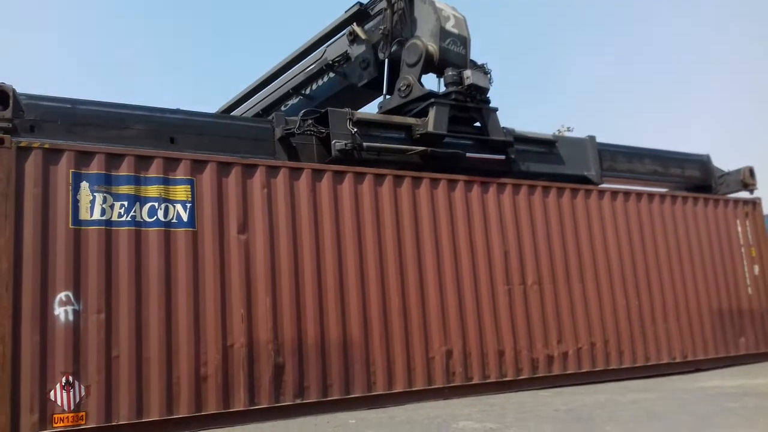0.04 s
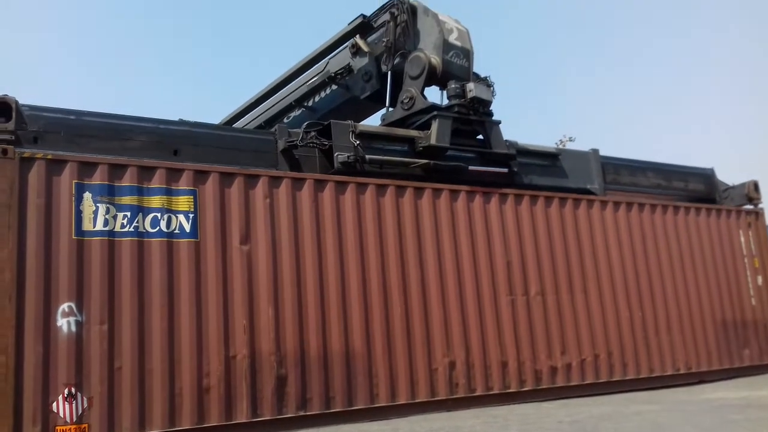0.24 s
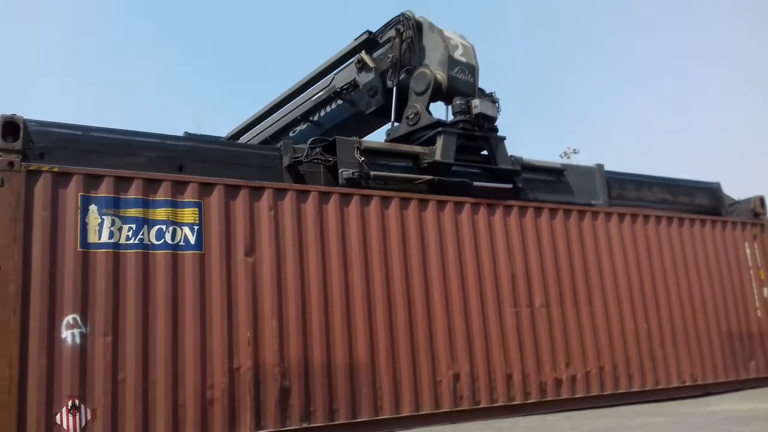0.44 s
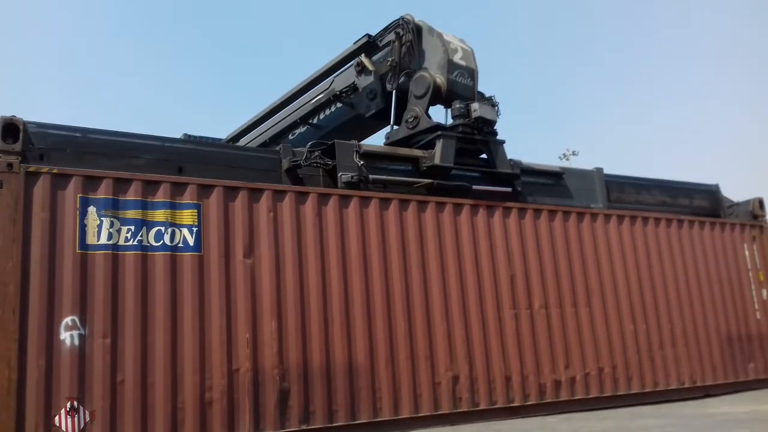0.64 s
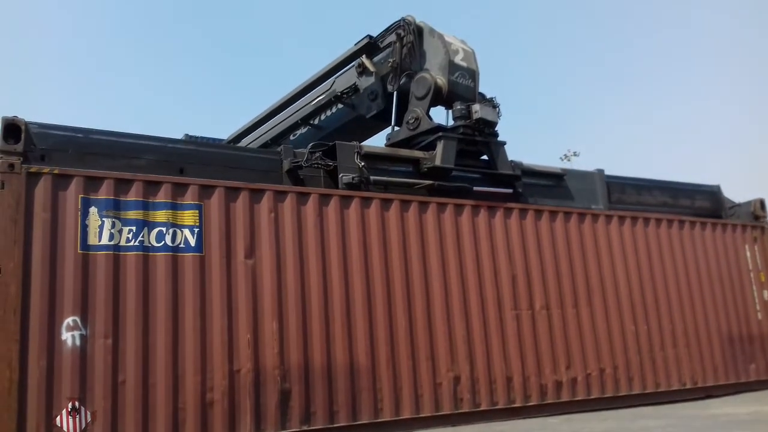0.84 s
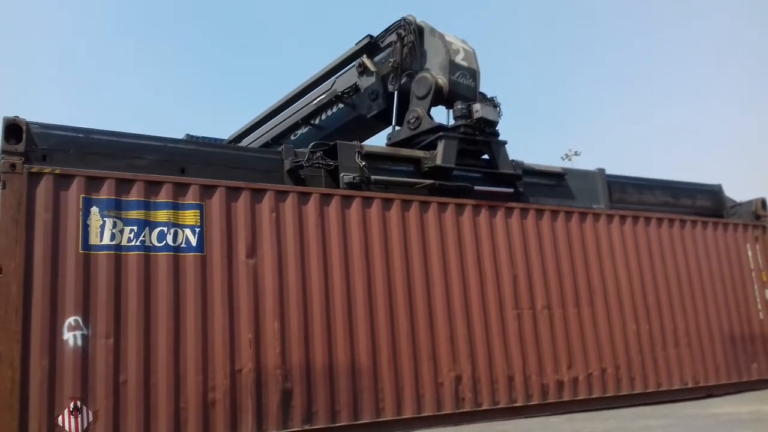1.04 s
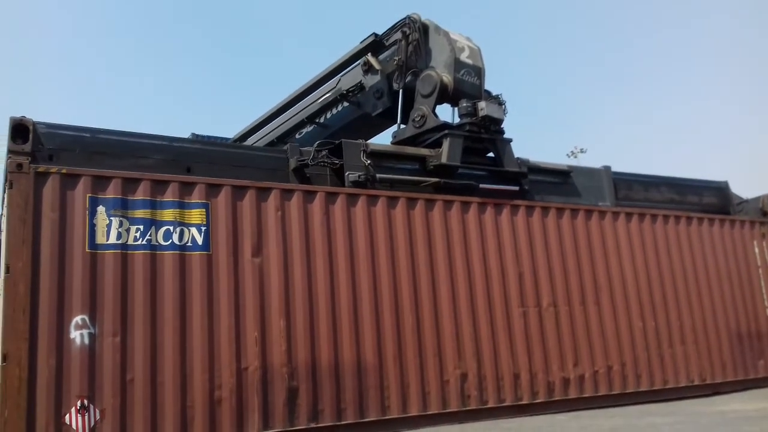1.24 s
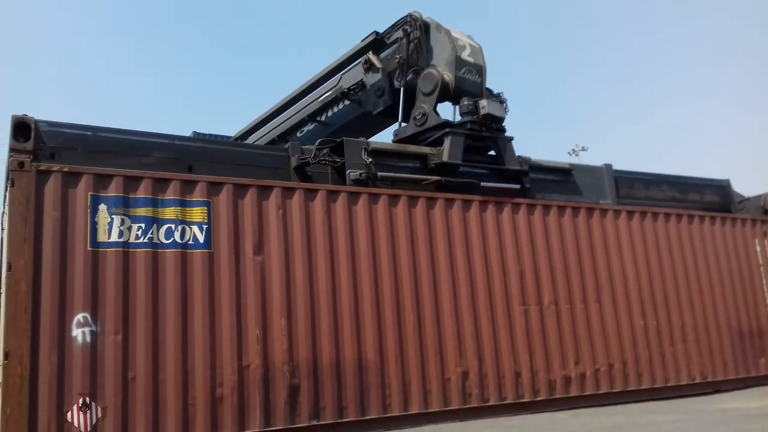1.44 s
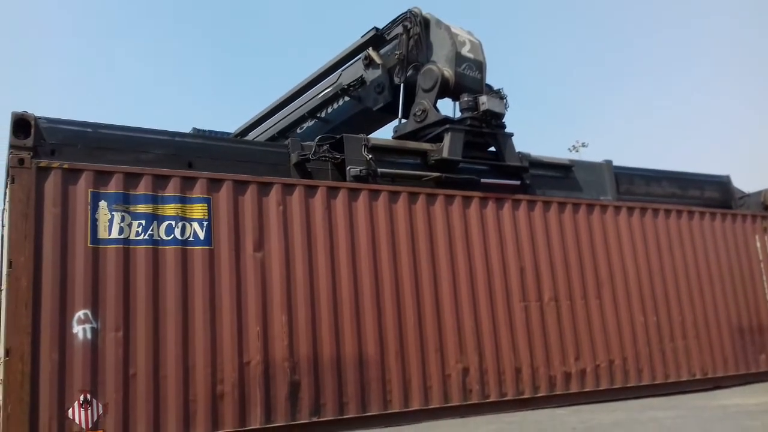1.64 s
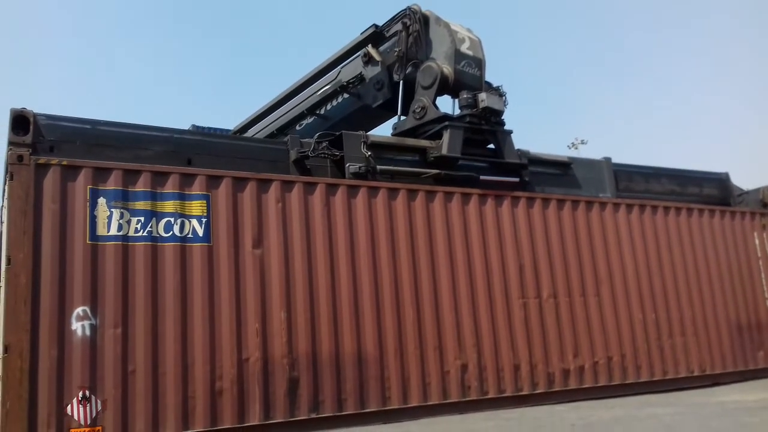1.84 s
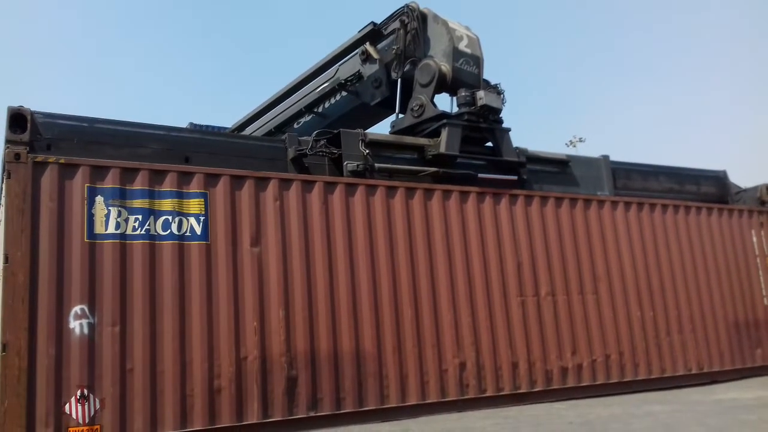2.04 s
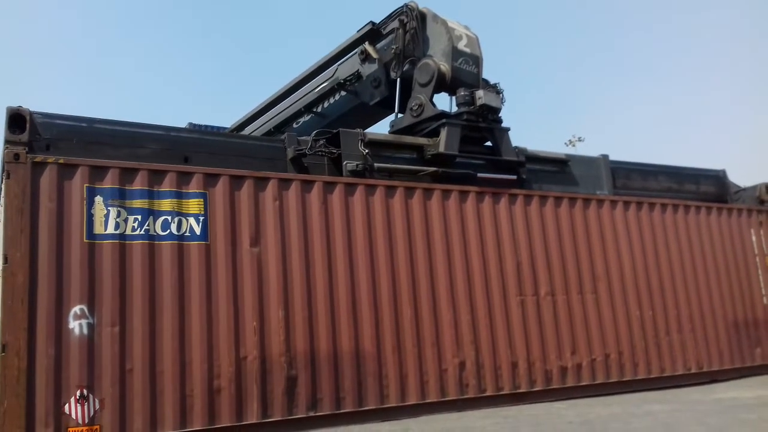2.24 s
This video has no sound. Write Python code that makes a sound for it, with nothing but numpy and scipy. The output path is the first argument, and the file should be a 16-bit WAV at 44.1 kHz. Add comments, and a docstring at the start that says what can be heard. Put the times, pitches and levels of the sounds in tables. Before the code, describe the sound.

Rattling metal blows build to a hollow, ringing crash as a lifting frame knocks an empty shipping container in an outdoor yard. After a short lull the fittings clank and squeak again, over a steady low diesel rumble.

```python
"""In a container yard, a lifting spreader (the crane's gripping frame) jolts against an empty steel
shipping container. A run of blows swells into a booming crash, then the fittings clank a few more times.
Each blow chatters and rings the walls, the frame and the locks. Loose parts click, square hits crack
and slipping steel squeaks. A diesel engine rumbles underneath, and a faint short groan comes at the end."""
import sys
import numpy as np
from scipy import signal
from scipy.fft import irfft
from scipy.io import wavfile
from scipy.ndimage import uniform_filter1d

SR = 44100
rng = np.random.default_rng(int(sys.argv[2]) if len(sys.argv) > 2 else 0)


def master(y):
    """Save y as 16-bit WAV."""
    cut = np.clip(np.atleast_2d(y).T, -1, 1)
    pcm = np.round(cut * 32767)  # scale
    wavfile.write(sys.argv[1], SR, pcm.astype(np.int16))


N = 105840  # 2.4 seconds

# The engine's low exhaust tones: multiple_of_firing_rate, relative_db
EXHAUST_TONES = [(2, -5.5), (3, -4), (4, -8.5), (5, -5.5), (6, -10.5)]
# Blows on the container: start_s, wall_boom_db, frame_clang_db, lock_ring_db, tick_db, spreader_share
STEEL_BLOWS = [ (0.001, -25, -29.5, -38, -51.5, 0.18), (0.044, -26.5, -32.5, -35, -56, 0.04),
               (0.121, -27.5, -26.5, -35, -57, 0.12), (0.195, -25, -21, -28, -50, 0.06),
               (0.231, -36, -15.5, -22.5, -45, 0.29), (0.251, -27, -12.5, -27, -43, 0.06),
               (0.300, -22.5, -22.5, -24, -49, .2), (0.329, -17, -13, -14, -38, 0),
               (0.364, -22.5, -15, -22, -39, 0.1), (0.393, -15.5, -14, -12.5, -28.5, 0.2),
               (0.412, -14, -9, -19, -33, 0), (0.439, -22, -22.5, -19, -40, 0.1),
               (0.472, -29, -19, -14.5, -33.5, 0.42), (0.490, -35, -28, -33, -45, 0),
               (0.533, -17.5, -10, -14, -28, 0), (0.570, -15, -18, -12.5, -33.5, 0),
               (0.605, -15.5, -16, -15, -37, 0), (0.642, -15.5, -26, -16, -40, 0.06),
               (0.676, -22, -30, -14, -34.5, 0), (0.700, -19, -24, -20, -55, 0.06),
               (0.742, -21.5, -26, -20.5, -50, 0), (0.821, -35, -22.5, -28, -53, 0.25),
               (0.888, -23.5, -26.5, -29.5, -56, 0.18), (1.078, -33.5, -28, -23.5, -55, 0.26),
               (1.332, -71, -25.5, -21.5, -44, 0.42), (1.342, -47, -20.5, -23, -39.5, 0.27),
               (1.360, -32.5, -23, -21, -41.5, 0), (1.383, -30.5, -20.5, -22, -43, 0.14),
               (1.425, -40, -24, -30, -52, .1), (1.475, -35, -17.5, -27, -42.5, 0.22),
               (1.491, -31.5, -26, -28, -49, 0.1), (1.550, -55, -26, -33, -54, 0.1),
               (1.612, -51, -21, -21, -37.5, 0.46), (1.622, -31.5, -20, -16, -33, 0.55),
               (1.635, -34, -20.5, -21, -32.5, 1.06), (1.698, -33, -22.5, -19, -30.5, 0.74),
               (1.755, -35, -23.5, -31.5, -36.5, 0.3), (1.778, -28.5, -25, -22, -37.5, 0.54)]
# How the walls, frame, locks and contact point ring, one row each (a fade is the time to drop 60 dB):
# rise_s, early_fade_s, late_fade_s, late_level_db
PART_FADES = [(0.024, 0.22, 1.16, -4.5), (0.011, 0.23, 0.85, -9.5), (0.015, 0.26, 0.89, -18.5),
              (0.00056, 0.14, 0.46, -5.5)]

# How strong each noise is from low to high: pitch_hz, relative_db
ENGINE_FAN_COLOUR = [(25, -20), (53, 1.5), (69, -12), (129, 7.5), (152, -6.5), (209, -4), (227, -3.5),
                     (349, -7), (445, 2), (482, -1.5), (804, -8), (1270, -4), (1950, -15.5), (2420, -9),
                     (2920, -23), (4150, -12), (5880, -39), (15500, -48.5)]
WALL_COLOUR = [(25, -43), (50, -18), (85, -3.5), (122, -2.5), (175, 1.5), (235, 1), (450, -2.5),
               (700, -6.5), (1500, -12.5), (4000, -73)]
FRAME_COLOUR = [(150, -41), (400, -14), (800, 0.5), (1150, -5), (1400, -3), (1950, -3.5), (2500, -8),
                (3200, -14.5), (5000, -51), (9000, -68)]
LOCK_COLOUR = [(900, -10), (2400, -8), (3100, -7), (3700, -1), (4200, 3), (4700, -3), (5200, -8),
               (5650, -20.5), (7500, -29.5), (10000, -50.5), (14000, -69)]
CONTACT_COLOUR = [(3000, -3), (5600, -1.5), (6400, 4), (7100, -6), (8500, -12.5), (10000, -15.5),
                  (12500, -35), (15500, -39)]
LOOSE_PART_COLOUR = [(2000, 3), (7000, -8.5), (9500, -19), (15500, -27)]
HARD_HIT_COLOUR = [(2000, 11), (2900, 1), (4500, 7.5), (5600, -10.5), (8000, -21), (10000, -56.5),
                   (15500, -56)]

# Clear tones of struck steel; the wall tones are low and drum-like: pitch_hz, relative_db, fade_s
CONTAINER_TONES = [(886.5, -1.5, 0.57), (958, -8.5, 0.8), (1470, -8, 0.17), (1793, 1, 0.36),
                   (2003, -0.5, 0.61), (3315, -11, 1), (3661, -5.5, 1), (4140, -1, 0.59),
                   (4550, -5.5, 0.66), (5206, -10, 0.8), (6340, -16, 0.47)]
SPREADER_TONES = [(300.7, -6.5, 1.45), (936, -14.5, 0.58), (1375, -4, 0.31), (1798, -7.5, 0.37),
                  (2494, -2, 0.3), (3984, 1.5, 0.33), (4130, -4.5, 0.56), (4550, -1, 0.55),
                  (5017, -12, 0.35), (5130, 1.5, 0.19)]
WALL_TONES = [(121, -8, 0.9), (228, -11, 0.7)]

# Light, dry clicks of loose parts: start_s, level_db
LOOSE_CLICKS = [(0.084, -31.5), (0.396, -36), (1.018, -65), (1.332, -37), (1.611, -21), (1.756, -28),
                (1.776, -24)]
# Hard cracks of steel on steel: start_s, level_db, low_edge_hz
HARD_CRACKS = [(0.085, -31.5, 2820), (0.218, -17.5, 3060), (0.231, -11, 1400), (0.301, -18, 2200),
               (0.330, -13, 1100), (0.365, -10.5, 1280), (0.492, -9.5, 585), (0.534, -5, 600),
               (1.018, -32, 2370), (1.078, -26, 3150), (1.311, -40.5, 3450), (1.340, -21.5, 808)]
# Steel slipping on steel: start_s, length_s, pitch_hz, level_db
STEEL_SLIPS = [(0.246, 0.042, 1870, -20), (0.391, 0.015, 6390, -22), (0.657, .08, 8400, -47),
               (0.609, 0.14, 6300, -41), (1.34, 0.02, 5700, -35.5), (1.356, 0.018, 3700, -23),
               (1.471, 0.014, 4320, -24), (1.697, 0.041, 6370, -32), (1.701, 0.045, 8470, -41),
               (1.70, 0.1, 4602, -23.5), (1.772, 0.03, 6300, -34)]


def undb(db):
    """Turn decibels into a number to multiply by."""
    return 10 ** (np.asarray(db) / 20)


def unit(x):
    """Scale a sound to an average power of 1."""
    return x / np.sqrt(np.mean(x ** 2))


def rise(t, rise_s):
    """Build up from 0 towards 1."""
    return 1 - np.exp(-t / rise_s)


def fade(t, fade_s):
    """Die away by 60 dB in fade_s seconds."""
    return np.exp(-np.log(1000) * t / fade_s)


def colour(points, size):
    """Join (pitch_hz, relative_db) points into a strength for every frequency."""
    hz, db = np.array(points).T
    all_hz = np.arange(size // 2 + 1) * SR / size
    return undb(np.interp(np.log(all_hz + 1), np.log(hz), db))


def ripple(spacing_hz, depth_db, size):
    """Random peaks and dips from low to high, kept small so that no single tone whistles."""
    bins = np.arange(size // 2 + 1)
    heights = rng.uniform(-0.8, 1, len(bins))
    return undb(depth_db * np.interp(bins * SR / size / spacing_hz, bins, heights))


def wash(strengths):
    """Countless tones, all out of step, blend into a noise with an average power of 1."""
    return unit(irfft(strengths * np.exp(2j * np.pi * rng.random(len(strengths)))))


def wander(rate_hz):
    """Drift at random around 0, typically by about 1."""
    step = int(SR / rate_hz)
    return uniform_filter1d(np.repeat(rng.standard_normal(N // step + 1), step), step)[:N]


def add(out, start_s, x):
    """Mix x in from a given time."""
    i = int(start_s * SR)
    out[i:i + len(x)] += x[:max(N - i, 0)]


def diesel_engine(firing_hz=42.95, hum_db=-46, noise_db=-40.5):
    """The exhaust hums low, while engine and fan noise throbs with each firing."""
    phase = 2 * np.pi * np.cumsum(firing_hz * (1 + 0.011 * wander(11))) / SR
    hum = sum(undb(db + 4.1 * wander(36)) * np.sin(round(multiple) * phase + 2 * np.pi * rng.random())
              for multiple, db in EXHAUST_TONES)
    throb = 1 + 0.12 * np.sin(phase)
    noise = wash(colour(ENGINE_FAN_COLOUR, N)) * throb * undb(0.4 * wander(41))
    return undb(hum_db) * unit(hum) + undb(noise_db) * noise


def clear_tones(tones, t, scatter_db=0.5, detune=0.004):
    """Struck steel rings; each tone's strength, phase and exact pitch vary with where the blow lands."""
    out = np.zeros(len(t))
    for hz, db, fade_s in tones:
        louder, phase, sharper = rng.standard_normal(3)
        wave = np.sin(2 * np.pi * hz * (1 + detune * sharper) * t + phase)
        out += undb(db + scatter_db * louder) * fade(t, fade_s) * wave
    return out


def chatter(ring, rebounds=5, span_s=0.03):
    """The first contact and a few weaker rebounds each set off the same ring."""
    out = ring.copy()
    for when, strength in rng.random((rebounds, 2)):
        lag = 1 + int(when * span_s * SR)
        out[lag:] += 2 * undb(-12) * strength * (1 - when) * ring[:-lag]
    return out


def container_blows(size=65536):
    """Each blow shakes countless tones in every part, drops quickly, then rings on with clear tones."""
    out, t = np.zeros(N), np.arange(size) / SR
    uneven = ripple(spacing_hz=12, depth_db=3.5, size=size)
    walls, *fittings = [colour(part, size) * uneven
                        for part in (WALL_COLOUR, FRAME_COLOUR, LOCK_COLOUR, CONTACT_COLOUR)]
    shapes = [rise(t, rise_s) * np.hypot(fade(t, early_s), undb(late_db) * fade(t, late_s))
              for rise_s, early_s, late_s, late_db in PART_FADES]
    wall_rise_s = PART_FADES[0][0]
    for start_s, boom_db, clang_db, ring_db, tick_db, share in STEEL_BLOWS:
        # Each spot that is hit favours different groups of tones.
        spot = ripple(spacing_hz=106.6, depth_db=6, size=size)
        parts = [walls] + [part * spot for part in fittings]
        levels_db = (boom_db, clang_db, ring_db, tick_db)
        crash = sum(undb(db) * shape * wash(part) for db, shape, part in zip(levels_db, shapes, parts))
        share = np.clip(share, 0, 1)  # 0 is all container, 1 is all spreader
        container = (1 - share) * undb(-16.5) * clear_tones(CONTAINER_TONES, t)
        spreader = share * undb(-5) * clear_tones(SPREADER_TONES, t)
        force = np.hypot(undb(clang_db), undb(ring_db))
        ring = force * (container + spreader) * rise(t, rise_s=0.0022)
        boom = undb(boom_db) * clear_tones(WALL_TONES, t) * rise(t, wall_rise_s)
        add(out, start_s, chatter(crash + boom + ring))
    return out


def loose_clicks(size=8192):
    """Small loose parts tick without ringing the container."""
    out, t = np.zeros(N), np.arange(size) / SR
    shape = rise(t, rise_s=0.0009) * fade(t, fade_s=0.044)
    for start_s, db in LOOSE_CLICKS:
        add(out, start_s, undb(db) * shape * wash(colour(LOOSE_PART_COLOUR, size)))
    return out


def hard_cracks(size=8192):
    """Steel meets steel squarely with a hard, dry crack; lighter parts have less low end."""
    out, t = np.zeros(N), np.arange(size) / SR
    hz = np.arange(size // 2 + 1) * SR / size
    shape = rise(t, rise_s=0.0009) * fade(t, fade_s=0.1)
    for start_s, db, low_edge_hz in HARD_CRACKS:
        low_cut = np.minimum(hz / low_edge_hz, 1) ** 4
        add(out, start_s, undb(db) * shape * wash(colour(HARD_HIT_COLOUR, size) * low_cut))
    return out


def steel_squeaks():
    """Steel faces slip for a moment under load and sing on a rough, wavering pitch."""
    out, waver = np.zeros(N), 1 + 0.009 * wander(700)
    for start_s, length_s, hz, db in STEEL_SLIPS:
        first, count = int(start_s * SR), int(length_s * SR)
        swell = np.sin(np.linspace(0, np.pi, count))
        phase = 2 * np.pi * np.cumsum(hz * waver[first:first + count]) / SR
        add(out, start_s, undb(db) * swell * np.sin(phase))
    return out


def groan(start_s=2.32, length_s=0.08, pitch_hz=452, level_db=-37):
    """A faint, short tone swells and fades."""
    t = np.arange(N) / SR
    swell = np.sin(np.pi * np.clip((t - start_s) / length_s, 0, 1))
    phase = 2 * np.pi * np.cumsum(pitch_hz * (1 + 0.011 * wander(60.4))) / SR
    return undb(level_db) * swell * np.sin(phase)


def scene():
    """Mix the steel sounds, the engine and the groan into one channel."""
    steel = container_blows() + hard_cracks() + loose_clicks() + steel_squeaks()
    return (steel + diesel_engine() + groan())[None]


def record(dry, low_cut_hz=46, high_cut_hz=15500):
    """Drop the deepest bass, round off the loudest peaks and cut the highest treble."""
    trimmed = signal.sosfilt(signal.butter(4, low_cut_hz, "highpass", fs=SR, output="sos"), dry)
    rounded = trimmed / (1 + trimmed ** 8) ** (1 / 8)
    return signal.sosfilt(signal.ellip(10, 0.1, 80, high_cut_hz, fs=SR, output="sos"), rounded)


dry = scene()
out = record(dry)
master(out)
```